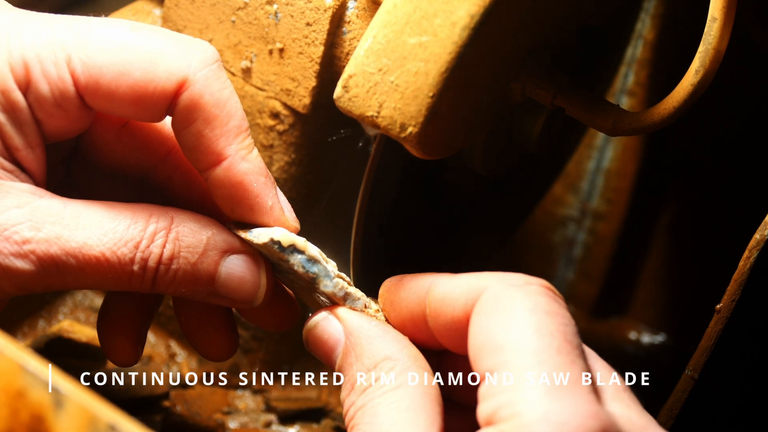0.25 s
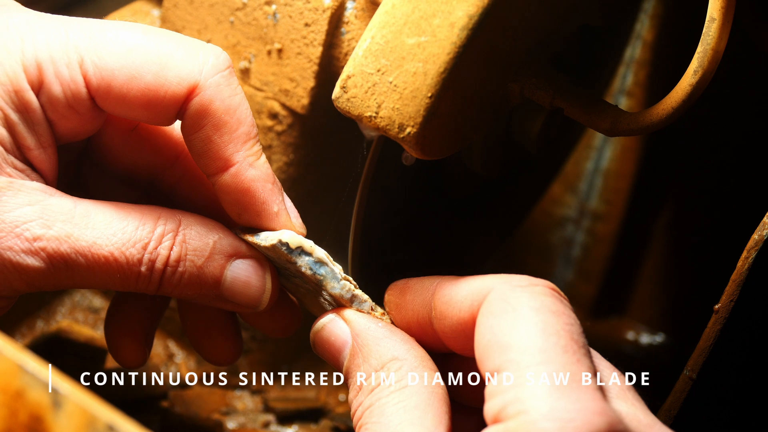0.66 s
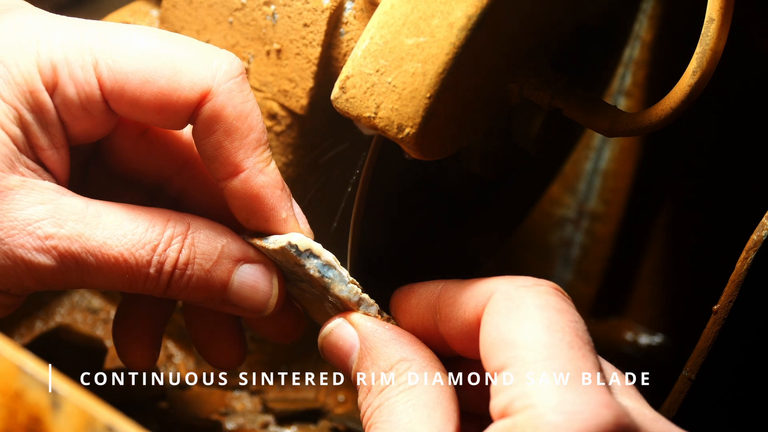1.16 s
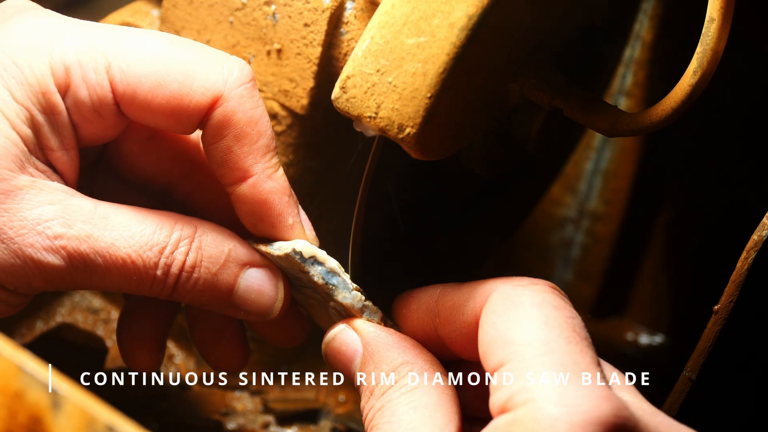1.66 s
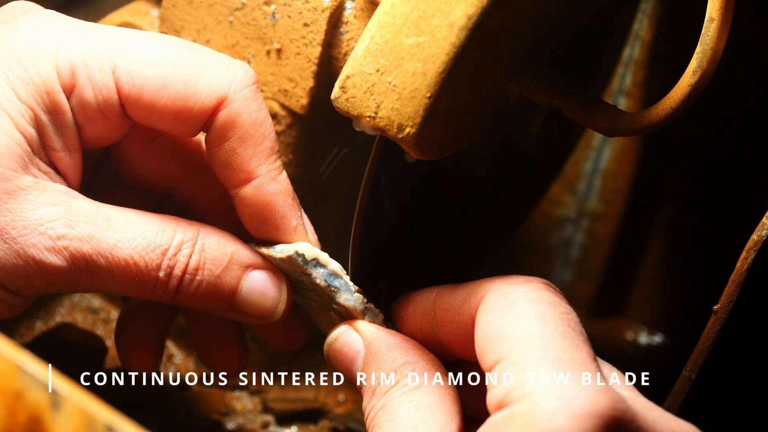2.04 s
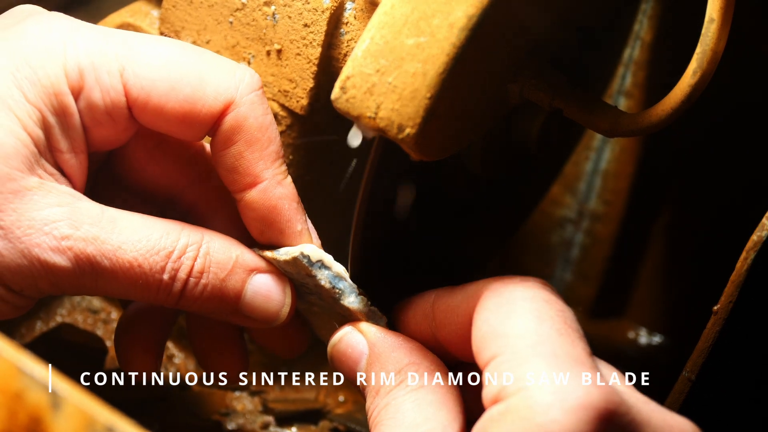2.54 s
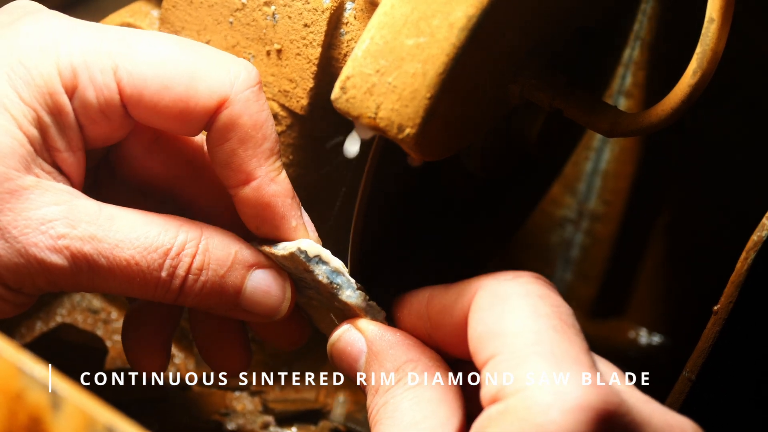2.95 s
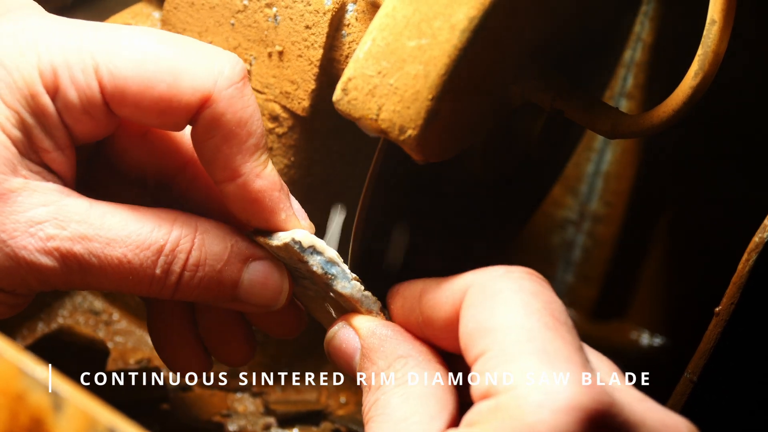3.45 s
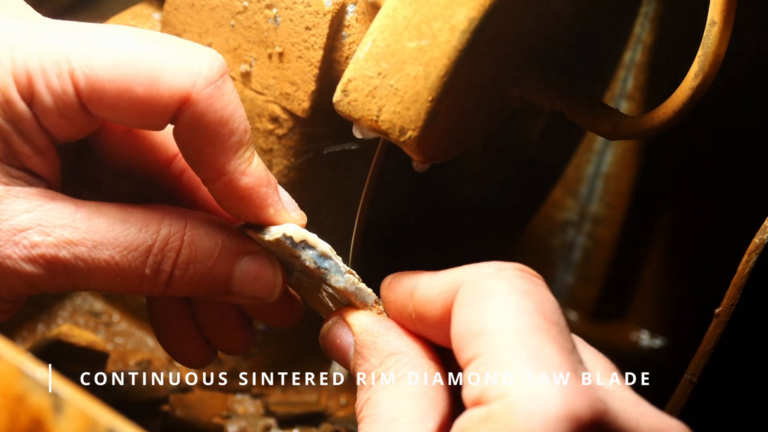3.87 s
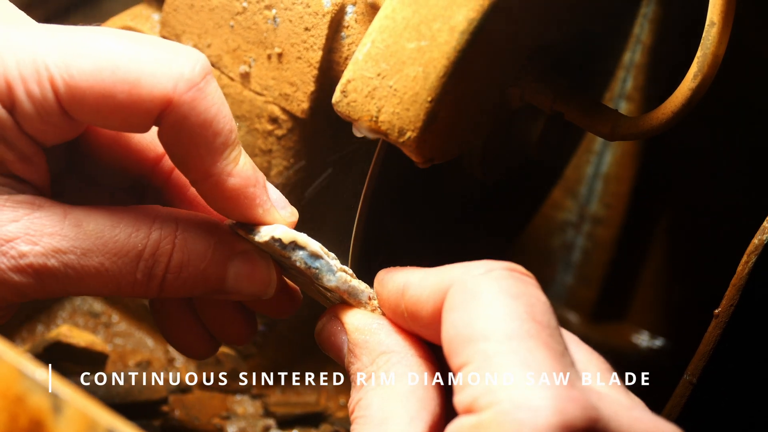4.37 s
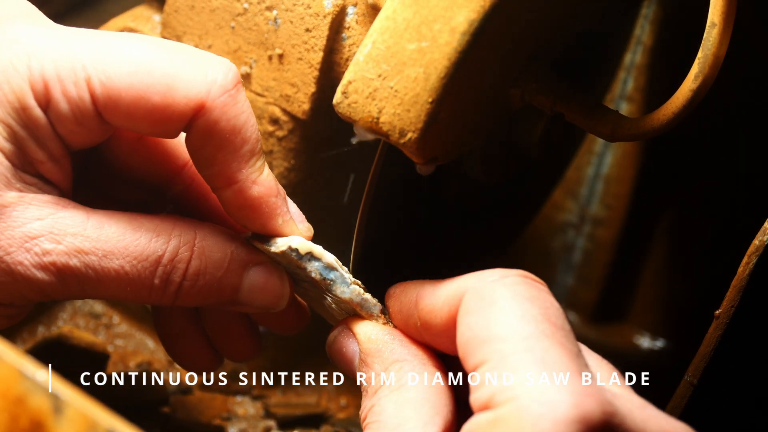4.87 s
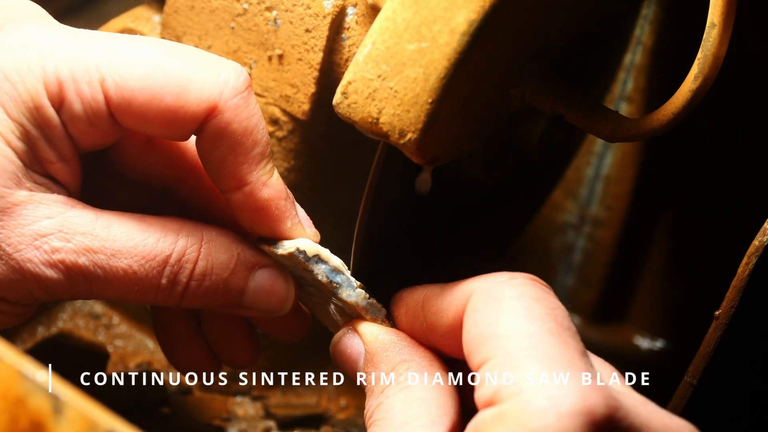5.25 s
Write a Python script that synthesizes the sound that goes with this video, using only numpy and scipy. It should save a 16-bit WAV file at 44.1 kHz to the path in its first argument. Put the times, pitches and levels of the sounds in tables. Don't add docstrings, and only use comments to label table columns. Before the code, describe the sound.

A continuous abrasive grind of stone against a spinning saw rim, already under way at the start. Rasping high hiss and a nasal metallic ring dominate; buzzing whines come and go as the hands shift the stone. Brief dip near three seconds, tiny rattling jolts before four, a strong lower whine around four and a half, then lighter, hissier cutting. Close stereo microphone, nearly centred, short room reflections, low hum underneath.

```python
import sys
import numpy as np
from scipy import signal
from scipy.fft import rfft, irfft, next_fast_len
from scipy.io import wavfile
from scipy.ndimage import map_coordinates

SR = 44100
rng = np.random.default_rng(int(sys.argv[2]) if len(sys.argv) > 2 else 0)


def master(y):
    cut = np.clip(np.atleast_2d(y).T, -1, 1)
    pcm = np.round(cut * 32767)
    wavfile.write(sys.argv[1], SR, pcm.astype(np.int16))


def attenuation_scalar(level_db):
    decades = np.asarray(level_db, float) / 20
    return 10 ** decades


N = 242991
HOP = 64


def clock():
    return np.arange(N // HOP + 2) * HOP / SR


def fine(control):
    return np.interp(np.arange(N) / HOP, np.arange(len(control)), control)


def curves(table):
    s, *columns = np.transpose(table)
    return [np.interp(clock(), s, column) for column in columns]


def walk(rate):
    levels = rng.standard_normal(int(N / SR * rate) + 3)
    return map_coordinates(levels, [clock() * rate], order=3)


def bump(start, end):
    off_centre = (2 * clock() - start - end) / (end - start)
    return np.exp(-np.log(2) * np.abs(off_centre) ** 3)


def unit(x):
    return x / np.sqrt(np.mean(np.abs(x) ** 2))


def on_log(hz, table):
    points_hz, db = np.transpose(table)
    return np.interp(np.log(hz + 1), np.log(points_hz), db)


def resonance(hz, centre, width):
    return 1 / (1 + (2 * (hz - centre) / width) ** 2)


def touch_db():
    return -1.5 * np.exp(-clock() / 0.086)


def cut_depth():
    return np.interp(clock(), (1.9, 2.9), (0, 1))


def rim(turns):
    first_order, steps = 30, 4096
    memory, coarse_order = 55., 42.
    order = np.arange(401) / 2
    bumps = rng.standard_normal((int(turns[-1]) + 2, 401, 2)) @ np.array([1, 1j])
    keep = np.exp(-(1 + (order / coarse_order) ** 2) / memory)
    for k in range(1, len(bumps)):
        bumps[k] = keep * bumps[k - 1] + np.sqrt(1 - keep ** 2) * bumps[k]
    whole = order % 1 == 0
    place = [turns, turns / 2 % 1 * steps]
    parts = []
    for chosen in (whole & (order > first_order), ~whole):
        shape = irfft(bumps * chosen, steps)
        parts.append(unit(map_coordinates(shape, place, order=1, mode="grid-wrap")))
    return parts


def contact(turns):
    # time in seconds, level in dB over the repeating rim.
    grit_levels = [(0, 4.5), (1.74, 3.5), (1.86, -6), (2.65, -5), (2.8, 1), (3.0, 0), (3.15, -5.5),
                   (4.2, -4.5), (4.45, -3), (4.6, -9), (4.85, -7), (5.1, 0), (5.51, 4)]
    # start in seconds, end in seconds, level in dB over the rim.
    chatter_spells = [
        (2.3, 2.95, -3),
        (4.8, 5.6, -9),
    ]
    grit = fine(attenuation_scalar(curves(grit_levels)[0]))
    bounce = attenuation_scalar(-17)
    for start, end, db in chatter_spells:
        bounce = bounce + attenuation_scalar(db) * bump(start, end)
    bounce = fine(bounce)
    repeat, chatter = rim(turns)
    high_spot = unit(np.exp(.09 * np.cos(2 * np.pi * turns)))
    force = repeat + bounce * chatter + grit * rng.standard_normal(N)
    return high_spot * force / np.sqrt(1 + bounce ** 2 + grit ** 2)


def resonate(force):
    # frequency in Hz, level in dB per Hz.
    base_colour = [(30, -41), (70, -54), (120, -29.5), (300, -24), (350, -28.5), (390, -7.5), (700, -6.5),
                   (1350, -3.5), (2500, -7), (5000, -3.5), (7500, -2.5), (11000, -6), (15000, -15)]
    # frequency in Hz, width in Hz, level in dB above the base colour.
    modes = [(790, 230, 9), (1763, 506, 12), (1887, 18.5, 21), (3560, 486, 10), (4190, 98, 4.5),
             (5840, 1450, 6.5), (6200, 170, 10), (6535, 190, 10), (6920, 124, 7.5), (7220, 63, 4.5),
             (8700, 140, 3.5), (8510, 330, 7), (9160, 144, 11), (9730, 540, 11), (10830, 160, 7),
             (11500, 110, 5.5), (11930, 84, 10), (12870, 130, 9.5), (14000, 170, 10), (14900, 100, 2.5),
             (1820, 68, 12.5)]
    # frequency in Hz, width in Hz, gain in dB.
    gaps = [(1386, 82, -5.5), (2433, 170, -5.5), (2830, 31, -2.5), (4810, 230, -6.5), (7230, 140, -3.5),
            (12000, 110, 2), (13200, 250, 1), (2510, 21, -1.5), (7530, 220, -1), (5420, 120, -3.5),
            (4160, 210, -0.5), (14600, 200, 1), (2990, 130, 0)]
    hz = np.fft.rfftfreq(N, 1 / SR)
    rings = sum((attenuation_scalar(db) ** 2 - 1).clip(0) * resonance(hz, f, w) for f, w, db in modes)
    spectrum = rfft(force) * attenuation_scalar(on_log(hz, base_colour)) * np.sqrt(1 + rings)
    for f, w, db in gaps:
        spectrum *= 1 + (attenuation_scalar(db) - 1) * resonance(hz, f, w)
    screech = spectrum[(hz > 5000) & (hz < 8000)]
    return spectrum * N / np.sqrt(2 * np.sum(np.abs(screech) ** 2))


def grind(turns):
    # time in seconds, feed pressure as screech level in dB,
    # bite angle as treble tilt in dB, loose grip as low rattle in dB.
    feed = [(0.1, -42, 0.5, -3.5), (0.34, -38, -0.5, -2.5), (1.42, -37.5, 1, 0), (1.73, -35, 1, -1.5),
            (1.74, -39, 3.5, 4), (2.2, -39.5, 1, -0.5), (2.85, -39.5, 1, -0.5), (3.05, -43, 3, 2),
            (3.09, -45.5, 1, 4), (3.17, -46.5, 4.5, 2.5), (3.19, -41.5, 0, 2.5), (3.53, -37.5, 1, -1),
            (4.06, -42, 0, 0), (4.54, -42, -1, 0.5), (4.56, -45, -0.5, 6), (4.69, -40.5, 0.5, 6),
            (5.18, -44.5, 2.5, 2), (5.51, -45.5, 0.5, 3.5)]
    # frequency in Hz, share from 0 to 1.
    follow = [(600, 0.5), (1900, 0.8), (3500, 0.28), (6400, 0.78), (12000, 0.88)]
    # frequency in Hz, level in dB.
    hollow_ranges = [(1330, -6), (2600, -1.5)]
    spectrum = resonate(contact(turns))
    screech_db, bite_db, grip_db = curves(feed)
    shallow = 1 - cut_depth()
    judder = (.2 + .25 * shallow) * walk(44.)
    late_db = -6 * np.exp(-clock() / 0.085)
    place = 3 * np.log2((np.fft.rfftfreq(N, 1 / SR) / 300).clip(1))
    out = 0
    for band in range(19):
        centre = np.log2(300) + band / 3
        tilt_db = (on_log(2 ** centre, follow) - 1) * (screech_db - screech_db.mean()) + touch_db()
        tilt_db += bite_db * np.interp(centre, np.log2([6400, 9500]), (0, 1))
        tilt_db += grip_db * np.interp(centre, np.log2((880, 1690)), (1, 0))
        tilt_db += late_db * np.interp(centre, np.log2((1900, 2390)), (0, 1))
        hollow_db = -1 * (band < 4)
        for f, db in hollow_ranges:
            hollow_db = hollow_db + db * np.exp(-((centre - np.log2(f)) / .3) ** 2)
        tilt_db += shallow * hollow_db
        part = irfft(spectrum * (1 - np.abs(place - band)).clip(0), N)
        out = out + part * fine(attenuation_scalar(screech_db + tilt_db + judder + 1.2 * walk(55.)))
    return out


def blade(turns):
    # multiple of the shaft rate, level in dB.
    shallow_orders = [(2, -86), (3, -102), (4, -95), (5, -67), (6, -67.5), (7, -59.5), (8, -60), (9, -61.5),
                      (10, -44), (11, -49), (12, -63), (13, -67.5), (14, -49.5), (15, -66.5), (16, -62.5),
                      (17, -96), (18, -82), (19, -63.5), (20, -83), (21, -67), (22, -58), (23, -56),
                      (24, -45.5), (25, -75), (26, -61.5), (27, -68.5), (28, -71), (29, -88), (30, -67)]
    # multiple of the shaft rate, level in dB.
    deep_orders = [(2, -87.5), (3, -92), (4, -88), (5, -65.5), (6, -72), (7, -71.5), (8, -64.5), (9, -62.5),
                   (10, -60), (11, -53), (12, -60.5), (13, -66.5), (14, -47.5), (15, -64.5), (16, -65.5),
                   (17, -72), (18, -66), (19, -63.5), (20, -63), (21, -65), (22, -58.5), (23, -57),
                   (24, -55), (25, -78), (26, -58), (27, -63), (28, -62.5), (29, -67.5), (30, -63)]
    sing_orders = (10, 11, 14, 24)
    # start in seconds, end in seconds, multiple of the shaft rate, level in dB.
    songs = [(.08, .4, 10, -53), (0.34, 0.956, 10, -51), (0.907, 1.896, 10, -46.5), (2.348, 2.51, 10, -55),
             (2.697, 2.832, 10, -47), (3.058, 3.32, 10, -46), (3.695, 4.307, 10, -51),
             (4.333, 4.91, 10, -46), (1.35, 1.603, 11, -50), (2.045, 2.5, 11, -52.5), (3.1, 3.5, 11, -46.5),
             (3.66, 3.877, 11, -44.5), (4.0, 4.128, 11, -47), (4.133, 4.287, 11, -43),
             (4.407, 4.81, 11, -38.5), (4.85, 5.3, 11, -52.5), (2.194, 2.702, 14, -52.5),
             (2.98, 3.353, 14, -44.5), (4.0, 4.797, 14, -51.5), (4.8, 5.394, 14, -45),
             (5.4, 5.6, 14, -47.5), (0.1, .25, 24, -49), (0.227, 0.495, 24, -46), (0.75, 0.947, 24, -48),
             (0.95, 1.31, 24, -43), (1.61, 1.71, 24, -42), (1.8, 2.112, 24, -45.5), (2.2, 2.528, 24, -45.5),
             (2.75, 2.854, 24, -51), (3.16, 3.3, 24, -44), (3.284, 3.498, 24, -42.5), (3.54, 3.62, 24, -45),
             (3.68, 3.87, 24, -57), (3.945, 4.06, 24, -45), (4.146, 4.33, 24, -45), (4.43, 4.802, 24, -50),
             (4.82, 5.094, 24, -48), (5.367, 5.6, 24, -49)]
    # start and end in
    # seconds, multiple of the shaft rate, level in dB.
    passing_swells = [(1.76, 2.12, 21, -48), (2.06, 2.33, 16, -51), (2.7, 3.19, 9, -50), (2.72, 3.11, 7, -53),
                      (2.83, 3.18, 16, -47.5), (2.98, 4.4, 23, -51), (3.06, 3.5, 23, -47), (3.5, 3.89, 23, -47),
                      (3.43, 4.15, 19, -49.5), (3.99, 4.58, 12, -49.5), (3.7, 4.71, 20, -49.5),
                      (4.68, 5.47, 9, -50.5), (4.72, 5.36, 23, -48.5), (5.1, 5.9, 16, -52), (4.7, 5.65, 21, -49),
                      (0.52, 2.5, 6, -59), (1.3, 1.56, 8, -54), (4, 3.6, 25, -57), (3, 4, 13, -54),
                      (3.1, 4.75, 18, -55.5), (2.04, 2.6, 20, -53.5), (2.9, 3.1, 27, -59), (5.2, 5.6, 27, -57),
                      (5.35, 5.9, 25, -49), (2.25, 2.6, 15, -54), (3.33, 3.74, 11, -46.5), (3.4, 3.6, 27, -50),
                      (2.8, 2.7, 25, -60), (2.72, 2.8, 21, -52),
                      (.15, .96, 44, -53), (.91, 1.26, 78, -48), (1.06, 1.97, 83, -49), (1.16, 1.41, 116, -51),
              (1.41, 2.07, 88, -52), (1.56, 1.76, 73, -51), (1.76, 2.42, 106, -52), (1.92, 2.37, 70, -50),
              (2.02, 2.22, 43, -48), (2.02, 2.83, 107, -52), (2.07, 2.27, 108, -49), (2.22, 2.62, 83, -51),
              (2.62, 2.83, 82, -48), (3.18, 3.38, 78, -50), (3.18, 3.54, 47, -51), (3.18, 3.54, 83, -49),
              (3.28, 3.59, 73, -47), (3.33, 3.64, 43, -49), (3.33, 3.64, 93, -52), (3.99, 4.4, 123, -51),
              (4.55, 4.76, 74, -51), (4.61, 4.86, 79, -46), (.7, .96, 44, -47), (.7, .95, 53, -51),
              (.2, .55, 44, -50), (.65, .9, 150, -54), (1.1, 1.5, 45, -51), (1.81, 2.1, 132, -53),
              (1.97, 2.22, 137, -54), (1.36, 1.66, 65, -53),
                      (.2, .55, 53, -54), (.1, 1.3, 150, -56), (.15, 1.3, 163, -62), (.3, 1.5, 178, -64),
                   (2.1, 3.0, 8, -58), (2.3, 2.75, 9, -55), (.95, 1.4, 44, -54), (1.3, 2.8, 158, -63),
                   (3.1, 4.0, 151, -60), (3.1, 3.45, 34, -54), (3.65, 3.95, 34, -53), (3.25, 3.8, 36, -54),
                   (5.15, 5.6, 30, -54), (4.6, 4.8, 32, -55), (4.85, 5.05, 34, -55), (4.85, 5.05, 36, -55),
                   (4.3, 4.75, 13, -54), (5.3, 5.6, 16, -50), (3.2, 3.45, 15, -54), (3.65, 4.0, 20, -53),
                   (4.7, 5.5, 7, -58), (1.6, 2.2, 3, -82), (.8, .98, 2, -80), (4.98, 5.2, 43, -51),
                   (4.5, 4.78, 45, -51), (1.9, 2.45, 7, -56), (2.05, 2.5, 12, -56)]
    # time in seconds, level in dB.
    jolts = [
        (3.732, -39),
        (3.745, -37),
        (3.781, -41),
        (3.795, -39),
        (3.808, -46),
        (3.845, -37.5),
        (.32, -35.5),
        (1.27, -35),
    ]
    depth = cut_depth()
    gains = {}
    for (k, shallow_db), (_, deep_db) in zip(shallow_orders, deep_orders):
        gains[round(k)] = attenuation_scalar(shallow_db + depth * (deep_db - shallow_db) + 2.5 * walk(2.96))
    for k in range(4, 20):
        gains[k] = gains[k] * attenuation_scalar(-7 * np.exp(-clock() / .4))
    del gains[5]
    for k in sing_orders:
        gains[k] = gains[k] * attenuation_scalar(-8)
    half_s = .005
    knocks = [(s - half_s, s + half_s, 24, db) for s, db in jolts]
    for start, end, k, db in songs + passing_swells + knocks:
        ring = attenuation_scalar(db - .8) * bump(start, end)
        gains[round(k)] = np.maximum(gains.get(round(k), 0), ring)
    out, rise = 0, attenuation_scalar(touch_db())
    for k, gain in gains.items():
        wander = fine((0.23 + 0.0081 * k) * walk(14.))
        phase = 2 * np.pi * (k * turns + rng.random()) + wander
        flutter = attenuation_scalar(2.22 * walk(23.986))
        out = out + np.sqrt(2) * fine(gain * rise * flutter) * np.sin(phase)
    return out


def motor():
    t = np.arange(N) / SR
    throb = 1 + .25 * np.cos(2 * np.pi * 24.7 * t)
    level = fine(attenuation_scalar(-61 + 0.95 * walk(5.2)))
    return np.sqrt(2) * level * throb * np.sin(2 * np.pi * 400 * t)


def walls(x):
    # frequency in Hz, side minus mid in dB.
    wall_colour = [(60, -12), (110, -21), (200, -10), (380, -19), (700, -12.5), (1290, -11.5), (2380, -9),
                   (4400, -7.5), (8120, -16.5), (15000, -4)]
    t60_s, delay_s = .45, .025
    t = np.arange(SR // 2) / SR
    tail = rng.standard_normal(len(t)) * np.exp(-np.log(1000) * t / t60_s) * (t > delay_s)
    tail = tail / np.linalg.norm(tail)
    size = next_fast_len(N + len(t))
    colour = attenuation_scalar(on_log(np.fft.rfftfreq(size, 1 / SR), wall_colour) + .5)
    echoes = irfft(rfft(x, size) * rfft(tail, size) * colour, size)[:N]
    low_band = signal.butter(3, [90, 330], "band", fs=SR, output="sos")
    rumble = signal.sosfilt(low_band, rng.standard_normal(N))
    return echoes + attenuation_scalar(-94) * unit(rumble)


def scene():
    # time in seconds, turns per second in Hz.
    shaft = [(0.0, 79.52), (0.8, 79.4), (1.4, 79.25), (1.95, 79.09), (2.25, 79.16), (2.75, 79.08),
             (3.2, 78.74), (3.7, 78.65), (4.05, 78.69), (4.4, 78.56), (4.6, 78.34), (5.0, 78.56),
             (5.51, 78.87)]
    turns = np.cumsum(fine(curves(shaft)[0])) / SR
    saw = grind(turns) + blade(turns) + motor()
    left_db = -.6
    pan = attenuation_scalar(np.array([[left_db], [-left_db]]) / 2)
    return saw * pan + walls(saw) * np.array([[1], [-1]])


def band_limit(x):
    return signal.sosfilt(signal.butter(12, 15390, fs=SR, output="sos"), x)


def record(dry):
    top_cut = signal.ellip(10, .2, 70, 15300, fs=SR, output="sos")
    mix = signal.sosfilt(top_cut, dry)
    return band_limit(mix)


dry = scene()
out = record(dry)
master(out)
```